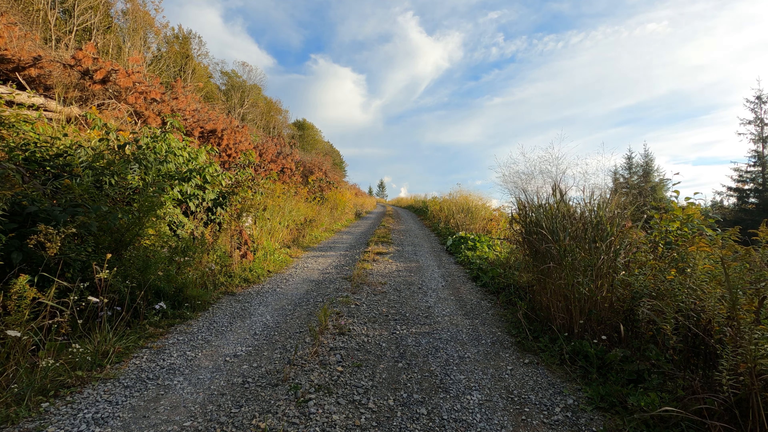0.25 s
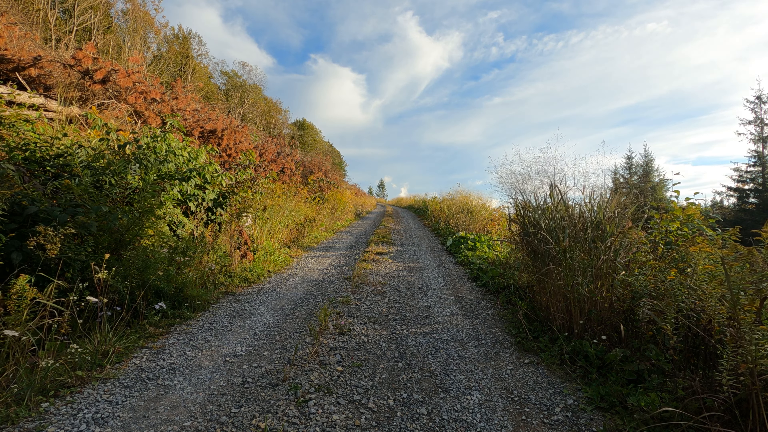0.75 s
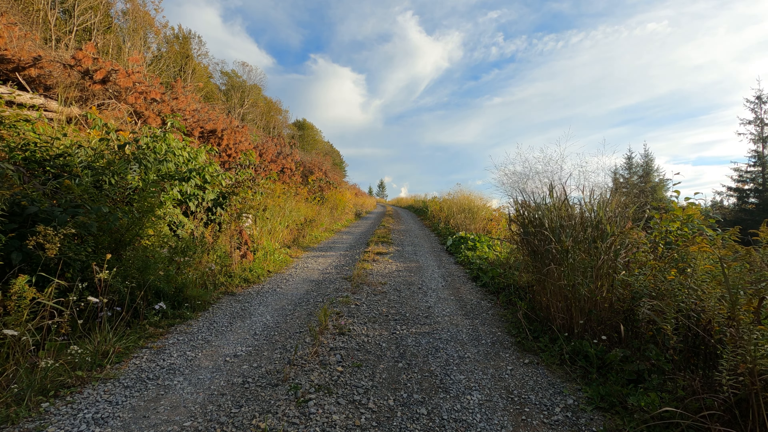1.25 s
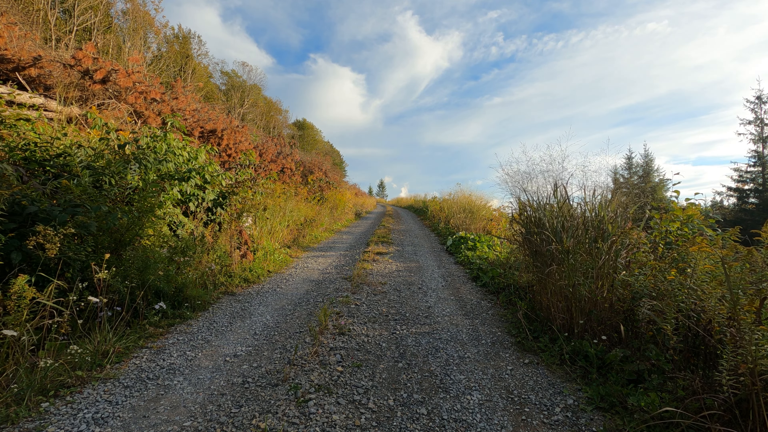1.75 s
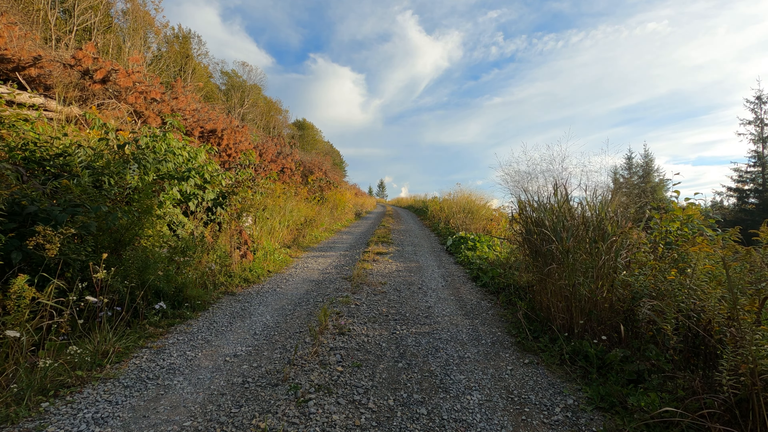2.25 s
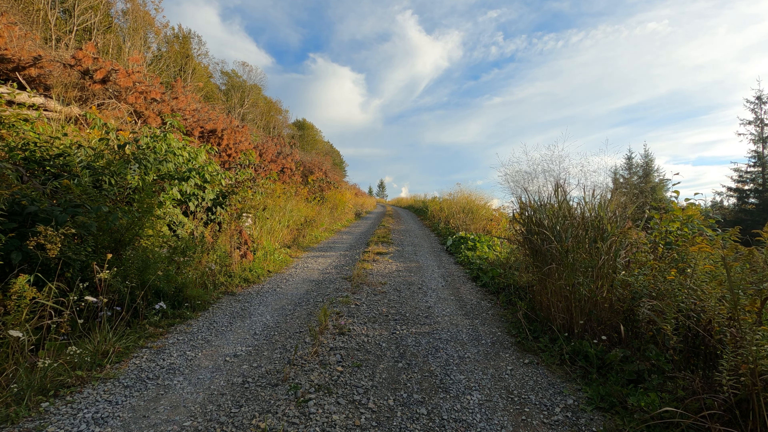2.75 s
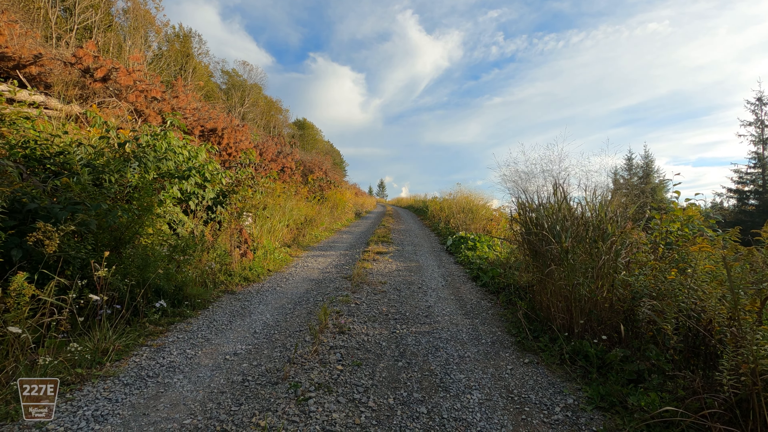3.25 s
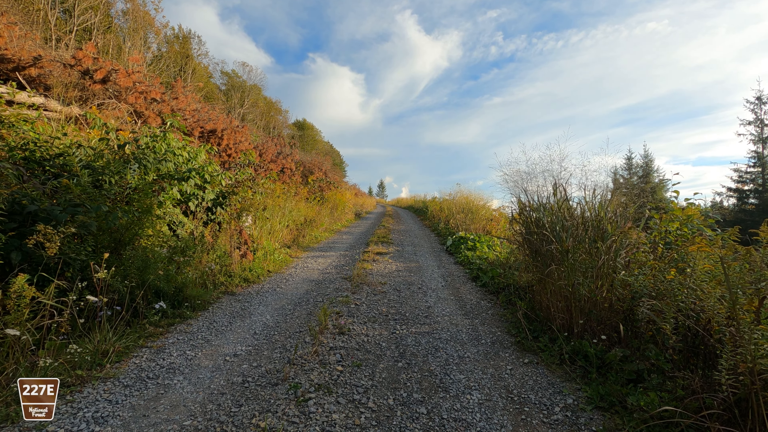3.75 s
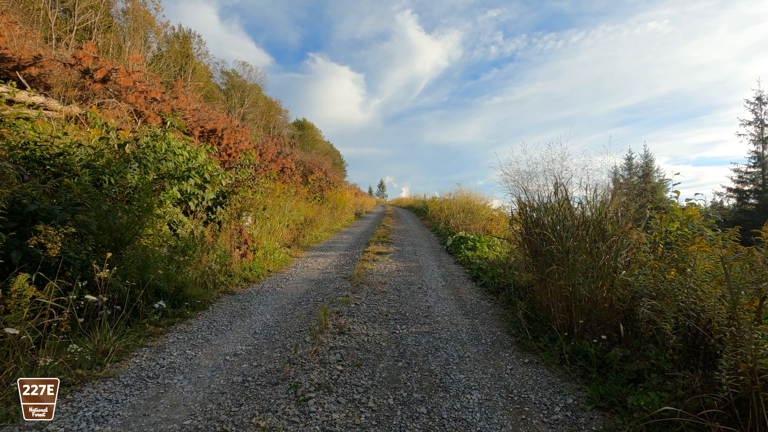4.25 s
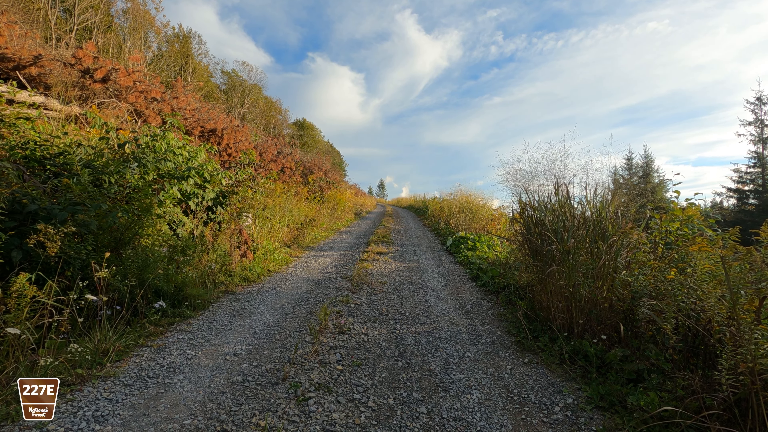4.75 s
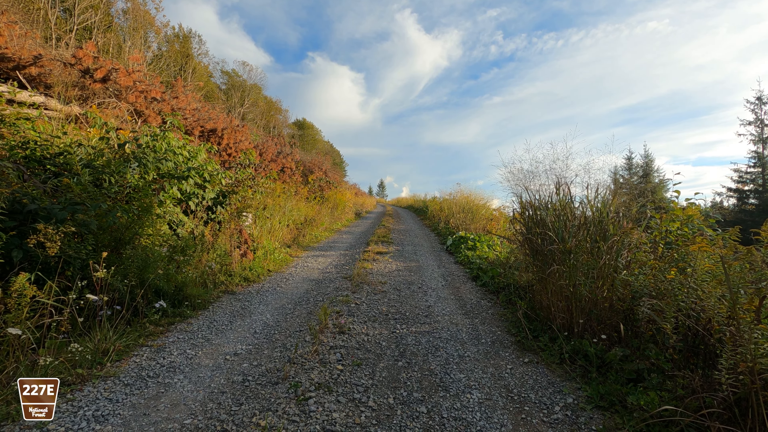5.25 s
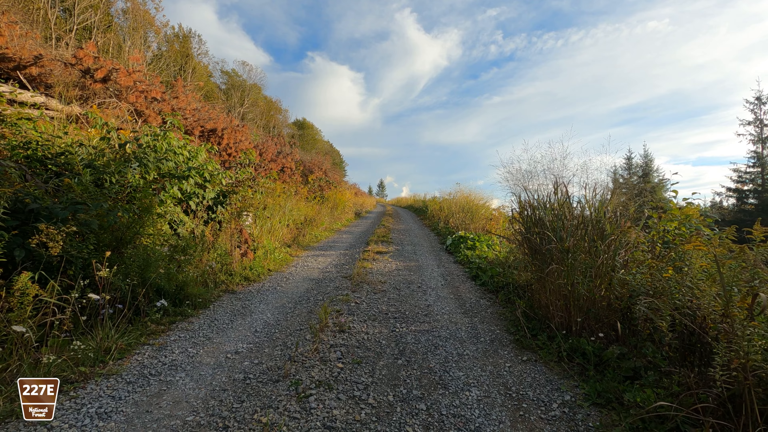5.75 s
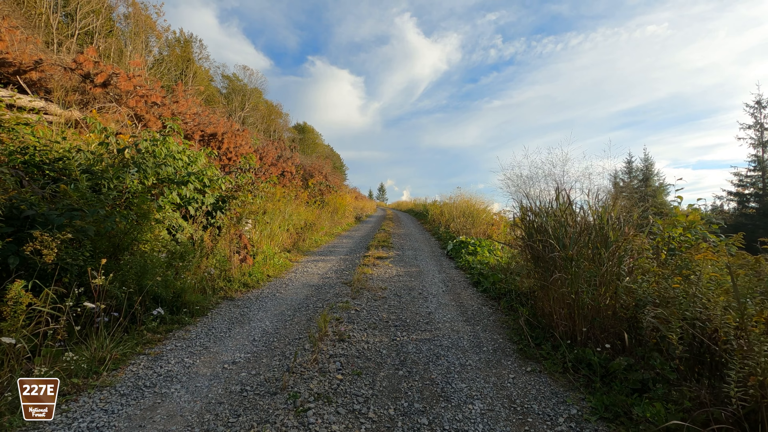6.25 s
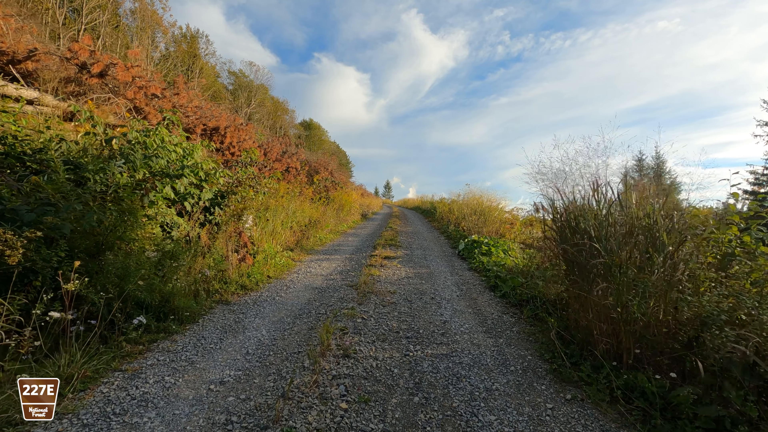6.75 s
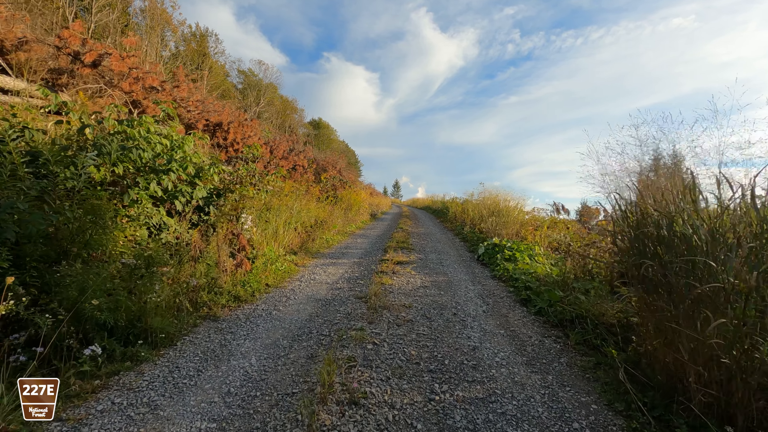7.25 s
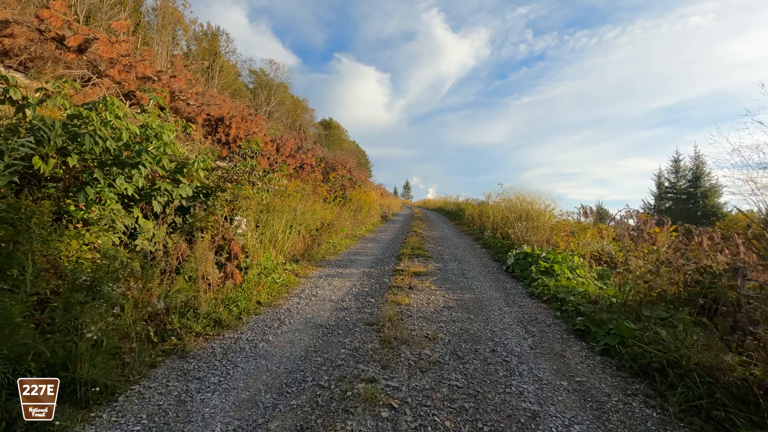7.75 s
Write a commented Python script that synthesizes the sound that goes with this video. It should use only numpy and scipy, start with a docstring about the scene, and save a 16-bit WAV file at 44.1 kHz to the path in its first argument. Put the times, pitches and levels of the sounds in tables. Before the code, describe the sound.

Gravel crunches under slowing vehicle tyres, almost stopping over a faint engine idle, then revs rise and stones pop and knock as it pulls away.

```python
"""Gravel crunches under the tyres of a vehicle creeping up a forest road, heard from on board.
Crunch, grit, pebbles and crackles are random grains or ticks, filtered or rung; stones pop with damped knocks.
The roll slows almost to a halt over an idling engine, then the revs rise and the tyres bite again.
The engine is a sum of crank orders; panel, running gear and metal parts are fuzzy tones or decaying modes."""
import sys
import numpy as np
from scipy import signal
from scipy.fft import rfft, irfft
from scipy.io import wavfile

SR = 44100
rng = np.random.default_rng(int(sys.argv[2]) if len(sys.argv) > 2 else 0)


def log_audio(samples):
    """Write samples as a 16-bit WAV file to the path given in sys.argv[1]."""
    # one column per channel
    frames = np.atleast_2d(samples).T
    # limit to full scale, then quantise
    limited = np.clip(frames, -1, 1)
    pcm = np.round(limited * 32767).astype(np.int16)
    wavfile.write(sys.argv[1], SR, pcm)


N = 353682
TIME = np.arange(N) / SR
HZ = np.fft.rfftfreq(4096, 1 / SR)
EDGE_HZ = 14200  # upper band limit
IDLE_CRANK_HZ = 18.02
BOOM_DB, BOOM_SLOPE = -57, 1.2  # cabin boom at the loudest idle; its dB per dB of idle level
SLOW_S, SLOW_FOR_S = 0.42, 2  # panel buzz comes forward as the wheels slow
DRIVE_S, DRIVE_FOR_S = 5.8, 0.18  # drive takes up
SPIN_S, SPIN_HALF_S = 6.33, 0.12  # wheels slip at the height of the pull
PATCH_HALF_S = 0.044  # half the time spent on a patch

# All levels are relative; the functions set the final balance.
# Tyres slowing down: (time [s], crunch [dB], grit hiss [dB])
COAST_LEVELS = [(0.2, -41.5, -53), (1.1, -43.5, -55), (1.6, -45.5, -60.5), (2.45, -46, -58.5),
                (3.15, -50.5, -63), (3.85, -58.5, -66), (4.3, -57.5, -67.5), (5.05, -55, -62),
                (5.85, -58.5, -64.5)]
# Tyres pulling away: (time [s], crunch [dB], grit hiss [dB])
PULL_LEVELS = [(5.9, -51, -62.5), (5.96, -47.5, -59.5), (6.05, -43.5, -51), (6.25, -40.5, -46.5),
               (6.44, -38, -52), (6.58, -45.5, -55), (6.97, -47, -59.5), (7.2, -47, -58.5),
               (8.0, -47.5, -59)]
# Gravel through the bodywork, coasting: (frequency [Hz], density [dB per Hz])
COAST_COLOUR = [(45, -8), (110, -7.5), (170, -1.5), (300, -10), (500, -2), (750, -8), (1000, -17),
                (1400, -23), (2100, -28), (3000, -29.5), (4200, -36), (5800, -42.5), (6600, -48),
                (9500, -58), (13000, -84)]
# Gravel at a crawl: (frequency [Hz], density [dB per Hz])
CREEP_COLOUR = [(45, -5.5), (150, -2.5), (300, -10.5), (500, -4), (750, -12.5), (1400, -13), (2100, -22),
                (4200, -27.5), (7500, -42), (9500, -53), (13000, -64)]
# Gravel under driven wheels: (frequency [Hz], density [dB per Hz])
PULL_COLOUR = [(45, -8), (100, -2), (170, 0.5), (230, 3.5), (300, -5.5), (500, -5.5), (750, -15),
               (1000, -14), (1400, -19.5), (2100, -20.5), (3000, -26), (4200, -31), (5600, -38),
               (7500, -40.5), (9000, -50.5), (10800, -52), (13000, -66)]
# Wheel-arch and panel resonances: (frequency [Hz], width [Hz], lift at full ring [dB])
PANEL_MODES = [(707, 82, 6.5), (971, 52, 9.5), (1422, 340, 9), (2136, 150, 7), (2760, 24, 11.5),
               (3770, 110, 6), (4270, 47, 5), (5120, 180, 4)]
# Loose patches swell the crunch, firm ones drop it: (time [s], change [dB])
PATCHES = [(0.57, 2), (1.099, 3.5), (2.64, -1), (2.9, 1.5), (2.99, -3), (3.13, 2.5), (3.34, -4.5),
           (3.43, 2.5), (4.37, -12)]
# Idling engine: (time [s], level [dB])
IDLE_LEVELS = [(0, -49), (2.2, -50.5), (2.9, -59), (4.3, -67), (5.85, -65), (6.05, -81)]
# Idle harmonics: (multiple of crank speed [-], level [dB])
IDLE_ORDERS = [(4, -28), (5, -16), (6, -4), (7, -11.5), (8, -8.5), (9, -3.5), (10, -9), (12, -6), (13, -22),
               (19, -6.5), (23, -14.5)]
# Engine under load: (time [s], crank speed [Hz], level [dB])
LOAD_REVS = [(5.92, 24.77, -56.5), (6.05, 30.54, -46), (6.2, 36.8, -44), (6.5, 36.9, -47.5),
             (6.75, 32.2, -55.5), (6.95, 30.72, -62), (7.5, 33.63, -54), (8.02, 35.5, -55.5)]
# Load harmonics: (multiple of crank speed [-], level [dB])
LOAD_ORDERS = [(1, -20), (2, -1), (3, -0.5), (4, 0), (5, -6.5), (6, -5.5), (7, -25), (8, -24)]
# Belt and fan whine: (frequency [Hz], level [dB])
WHINE_TONES = [(333.8, -75.5), (495.3, -80.5), (683.7, -64.5), (742.9, -78.5), (920.5, -76), (1373, -75),
               (1497, -79.5), (2180, -87)]
# Stones popping from under a tyre: (time [s], level [dB], pitch [Hz], swell [cycles], low body [dB],
# rattle [dB], rattle t60 [s], crack [dB], left minus right [dB])
STONES = [(1.123, -28, 298, 1.2, -6, 0, 0.12, -11.5, -3),
          (1.5341, -23.5, 448.0, 0.8, -15, 3.5, 0.05, -7.0, 0.5),
          (1.5456, -30.5, 310, 1.1, -15.0, 4, 0.15, -22.0, 2.5),
          (1.6558, -34, 408.0, 2.6, -6, -18, 0.05, -29, -4.5),
          (3.5586, -35, 474, 0.87, -8, 0.5, 0.21, -25, 0),
          (3.5733, -30, 463, 0.43, -15, -4.5, 0.18, -34.0, 1),
          (3.6032, -40, 350.0, 0.92, 4, -8, 0.18, -26, 0), (3.633, -41, 347.0, 1.3, -6, -16, 0.1, -24.0, 0),
          (4.0397, -37.5, 387, 1.5, 3.0, 0, 0.3, 2.5, 5), (4.0818, -34, 510, 1.1, -1, 1, 0.1, -25, 1),
          (4.4135, -39, 567.0, 0.7, -16, 3.5, 0.088, -13.0, 2),
          (4.4415, -35, 374, 2.3, -13, 1, 0.11, -10, 1),
          (4.4637, -24, 364.0, 1.7, -19.0, -7, 0.18, -14, -1),
          (4.4797, -32, 590, 0.94, -1, -1, 0.21, -25.0, 0),
          (4.4955, -30, 418.0, 0.58, 5, -17, 0.1, -23, 1.0),
          (4.5136, -40.5, 294, 1.4, 1, -1, 0.25, -19.0, 3),
          (4.5909, -42.5, 224.0, 0.45, 4, 5, 0.14, -11.5, 1.5),
          (4.606, -41, 333.0, 2.5, -9, -17, 0.08, -28.0, 1),
          (4.908, -44.0, 290, 1.3, -10, 1.5, 0.21, -12, 1),
          (6.295, -25.5, 525.0, 1.3, -20, -6.5, 0.34, -33, -5.5),
          (6.3038, -28, 353, 1.1, -13, -12, 0.04, -10, 2),
          (6.3372, -25.5, 410, 0.86, -1, -3.0, 0.04, -9.5, -1),
          (6.359, -24.5, 560.0, 1.1, 2, 1, 0.029, -23, -2),
          (6.3843, -20.5, 645, 1.2, -11, -8.5, 0.09, -31, -0.5),
          (6.4845, -20.0, 410, 2.16, -13, -8, 0.24, -6, -0.5),
          (6.52, -31.5, 220.5, 2.1, -6, -8, 0.11, -18.0, -3),
          (6.8261, -31.5, 340, 0.99, 0, -5, 0.18, -11, -2),
          (6.8481, -19.5, 384.0, 1.23, -2.5, -7.5, 0.15, -22, -1.3),
          (6.8563, -26.5, 433.0, 2.8, -23, -2, 0.11, -19.0, -1),
          (6.887, -29.5, 217, 1.2, -0.5, -9.0, 0.037, -31.0, -2),
          (7.101, -30.5, 603, 2, -26, -15, 0.14, -34.0, 5),
          (7.1147, -31.0, 513, 1.6, -8, -5.0, 0.073, -25.0, -2),
          (7.1314, -37.0, 702, 2.2, 6, -3, 0.29, -25.0, 1.4),
          (7.1574, -28.5, 582.0, 3, -3, -9.5, 0.15, -23, 2),
          (7.2445, -22.0, 498, 2.4, -14, -9, 0.22, -19, -1.5),
          (7.2515, -20.5, 680, 0.63, 6, -6, 0.1, -27, -0.5),
          (7.442, -16.5, 435, 1, -1.5, -14, 0.056, -25, 2),
          (7.4577, -38.5, 345, 2.6, -12, 7.5, 0.15, -13, 1),
          (7.5475, -24.5, 491.0, 1.6, -3.0, -10.5, 0.3, -30.0, -1),
          (7.6798, -31.0, 553, 2.5, -12, -20, 0.04, -35.0, 4.9),
          (7.6935, -26.5, 602, 2.8, -5.5, -9.5, 0.19, -32, 2.5),
          (7.7724, -32.5, 511.0, 1.3, -12, -10, 0.17, -31.0, 5.5),
          (7.8791, -22, 553, 2.2, -2, -3, 0.087, -30, 0.2),
          (7.9017, -30, 203, 0.64, -6, -9.0, 0.22, -30.0, 0.5),
          (7.943, -31.5, 463.0, 1.05, -23, -3.0, 0.13, -34.0, 3.5)]
# A wheel drops off a stone and the suspension thuds:
# (time [s], level [dB], pitch [Hz], rattle [dB], rattle t60 [s])
THUDS = [(1.142, -25.5, 104, -14, 0.18), (1.167, -33.5, 142, -13, 0.11), (2.012, -30, 89, -20, 0.47),
         (3.574, -26.5, 124, -17, 0.23), (3.596, -32, 110, -21, 0.13), (3.612, -33, 115, -20, 0.12),
         (4.043, -22, 140, -14.5, 0.32), (4.070, -26.5, 95, -13, 0.27), (4.121, -38, 115, -19, 0.2),
         (4.147, -37, 105, -16, 0.34), (4.518, -33, 123, -7.5, 0.24), (5.175, -30, 100, -9, 0.15),
         (6.088, -24.5, 121, -18, 0.16)]
# Grit squeezed against the wheel arch: (time [s], level [dB], t60 [s], fine-sand lift [dB])
SCRUNCHES = [(0.112, -37, 0.22, -21), (0.145, -38.5, 0.22, -13), (1.531, -32.5, 0.17, -13),
             (1.548, -38, 0.17, -11), (4.043, -44.5, 0.22, -1), (4.076, -50.5, 0.47, -8),
             (4.412, -36, 0.11, 6), (4.419, -33.5, 0.17, 6.5), (4.433, -48, 0.12, 3), (4.476, -42, 0.12, 1),
             (4.497, -45, 0.11, -14), (4.516, -43, 0.088, 10), (4.577, -44.5, 0.065, 16),
             (4.897, -46, 0.082, 13), (5.353, -45.5, 0.27, 0)]
# Colour of the squeezed grit: (frequency [Hz], gain [dB])
SCRUNCH_COLOUR = [(110, -9.5), (300, 15), (700, 6), (1000, 3.5), (1500, -2), (1900, -7), (2300, -3.5),
                  (2700, -0.5), (3200, -9.5), (4200, -11.5), (5500, -10), (7500, -20), (9500, -30),
                  (13000, -46)]
# Wheel-arch ringing under the grit: (frequency [Hz], level [dB])
ARCH_MODES = [(710, -1), (1390, -19), (1800, -5), (2000, -10), (2680, -18), (3450, -18), (4120, -27),
              (7150, -23)]
# Stones snapping against their neighbours: (time [s], level [dB], pitch [Hz])
CRACKLES = [(0.129, -33.5, 1404), (0.229, -43, 2020), (0.350, -48, 3180), (0.392, -43, 2060),
            (0.557, -39, 1450), (0.572, -54, 3400), (0.616, -45, 1660), (0.642, -50, 2210),
            (0.732, -42, 2440), (0.900, -52, 4470), (1.060, -45, 2010), (1.134, -42.5, 1730),
            (1.142, -54, 4400), (1.228, -48, 1700), (2.035, -53, 2350), (2.408, -57, 3300),
            (2.415, -53, 2360), (4.466, -39, 2450), (4.499, -39.5, 1400), (4.500, -50, 4180),
            (5.984, -47, 2980), (5.991, -44, 980), (6.047, -53, 1920), (6.035, -45, 1900),
            (6.080, -40, 2820), (6.087, -53, 7430), (6.138, -41, 2870), (6.163, -38, 2410),
            (6.172, -41, 1710), (6.224, -46, 4220), (6.228, -37, 2520), (6.245, -38, 2070),
            (6.250, -52, 5190), (6.291, -41, 2730), (6.333, -35, 1637), (6.382, -35.5, 2140),
            (6.458, -38, 2220), (6.467, -43, 1980), (6.547, -40.5, 2420), (6.573, -45, 2150),
            (6.661, -52, 2180), (6.701, -53, 3880), (6.848, -40.5, 1760), (6.95, -54, 1680),
            (7.146, -51, 3380), (7.160, -46, 1800), (7.210, -56, 4060), (7.301, -51, 2380),
            (7.428, -56, 4300), (7.455, -60, 7460), (7.511, -57, 3220), (7.717, -45, 2130),
            (7.748, -45.5, 2110), (7.780, -50, 2420), (7.832, -45, 2170), (7.845, -48, 2260),
            (7.867, -52, 2500), (7.977, -51, 2050)]
# Thin chirps of the running gear: (frequency [Hz], level re grit hiss [dB])
CHIRP_TONES = [(2200, -3.5), (2420, -11), (2910, -13), (3800, -8), (4080, -14.5), (5450, -21)]
# Running-gear squeaks: (time of loudest point [s], level [dB], pitch [Hz], half length [s])
SQUEAKS = [(1.400, -55, 2190, .012), (1.505, -52, 2220, .009), (1.678, -66, 3940, 0.0068),
           (1.72, -54, 2190, 0.0069), (1.826, -52, 2220, 0.015), (1.874, -65, 3780, 0.022),
           (2.030, -54.5, 2180, 0.016), (2.075, -61, 3740, 0.0091), (2.130, -57, 3800, 0.013),
           (2.190, -57.5, 2190, .009), (2.425, -55, 2180, 0.017), (2.510, -64, 3790, 0.023),
           (2.671, -62, 2200, .018), (2.856, -74, 3810, .009), (2.905, -65, 3900, 0.0079),
           (3.068, -69, 3780, 0.012), (3.19, -63, 3800, .009), (3.341, -65, 3790, 0.011),
           (3.528, -68, 3820, .01)]
# Jolts of the loose panel: (time [s], level [dB], pitch [Hz])
JOLTS = [(0.318, -37.5, 671), (0.365, -38.5, 758), (0.985, -38, 762), (1.33, -37.5, 710), (1.495, -37, 747),
         (1.77, -38.5, 707), (1.82, -37.5, 659), (1.88, -36, 740), (2.076, -37.5, 715), (2.17, -36.5, 720),
         (2.222, -37, 697), (2.334, -42, 686), (2.452, -46, 742), (2.505, -41, 704), (2.555, -37.5, 694),
         (2.72, -35, 713), (2.752, -40.5, 760), (2.779, -38, 703), (2.836, -39, 680), (2.892, -35.5, 696),
         (3.06, -39.5, 681), (3.085, -38, 704), (3.161, -40, 671), (3.226, -39, 694), (3.393, -39, 684),
         (3.466, -53, 710), (3.521, -44.5, 700), (3.69, -50.5, 685), (3.75, -46.5, 720),
         (3.863, -47.5, 674), (4.024, -40.5, 670), (4.769, -42.5, 717), (6.025, -37, 724),
         (6.045, -39.5, 1014), (6.145, -37.5, 971), (6.218, -33.5, 702), (6.245, -34, 721),
         (6.415, -42, 744)]
# Loose metal part clunking: (time [s], level [dB], brightness [dB per octave])
CLUNKS = [(4.414, -40, -1.5), (4.422, -43.5, 5.5), (4.477, -55, 6), (4.498, -50, -2), (4.516, -42, -17),
          (4.531, -49, -22), (4.578, -51, -12)]
# Its modes: (frequency [Hz], level [dB], t60 [s])
CLUNK_MODES = [(1754, -6.5, 0.11), (1910, -7.5, 0.18), (2110, -10, 0.21), (2680, -3, 0.067),
               (2934, -11, 0.12), (3490, -6.5, 0.14), (3850, -15, 0.11), (4077, -6, 0.11),
               (4160, -13.5, 0.2), (4820, -18, .15), (7100, -17, 0.081)]
# Bright clink of a small part: (time [s], level [dB], brightness [dB per octave])
CLINKS = [(4.897, -48, 0.0057)]
# Its modes: (frequency [Hz], level [dB], t60 [s])
CLINK_MODES = [(2650, -9, .068), (2875, -9, .09), (3750, -5.5, 0.079), (6560, -11, .07), (7170, 0, 0.049),
               (7520, -11, 0.1), (10100, -17, 0.044)]
# Duller clack of a small part: (time [s], level [dB], brightness [dB per octave])
CLACKS = [(5.356, -46.5, 0)]
# Its modes: (frequency [Hz], level [dB], t60 [s])
CLACK_MODES = [(1010, -3, 0.074), (1380, 1, 0.13), (1965, -24, 0.063), (2520, -3, 0.055),
               (2540, -10, 0.098), (3600, -6, 0.086), (4840, -16, .05), (7460, -17, .06)]
# Very short, faint bursts of high treble: (time [s], level before the band-pass [dB])
TREBLE_BURSTS = [(1.536, -57), (4.046, -60), (6.488, -59), (6.851, -54), (7.452, -52), (7.883, -52)]
# Stereo width: (frequency [Hz], level of the left-right difference [dB])
SIDE_COLOUR = [(60, -24), (250, -16.5), (600, -19), (1200, -6.5), (4000, -3), (8000, -4), (13000, -1)]
# Stereo lean: (frequency [Hz], left minus right at full width [dB])
LEAN = [(100, 0.51), (600, 3.1), (1200, 1.9), (4000, 2.2), (8000, 5.3)]
# The sound starts narrow and opens out: (time [s], width factor [-])
OPENING = [(2.25, 0.0052), (2.9, 0.12), (3.5, 0.59)]


def amp(db):
    """Decibels to gain."""
    return 10 ** (np.asarray(db) / 20)


def evened(x):
    """Scales to rms 1."""
    return x / np.sqrt(np.mean(x ** 2) + 1e-20)


def curves(rows):
    """Each column of a table, linear in time."""
    s, *columns = np.transpose(rows)
    return [np.interp(TIME, s, c) for c in columns]


def read(points):
    """A spectrum, linear in log frequency."""
    hz, value = np.transpose(points)
    return np.interp(np.log(HZ + 1), np.log(hz + 1), value)


def ramp(start_s, length_s):
    """Rises from 0 to 1."""
    return np.clip((TIME - start_s) / length_s, 0, 1)


def bump(centre_s, half_s):
    """A smooth hump of height 1."""
    return np.exp(-((TIME - centre_s) / half_s) ** 2)


def add(mix, s, sound):
    """Mixes a sound in at a time."""
    part = mix[max(round(s * SR), 0):][:len(sound)]
    part += sound[:len(part)]


def colour(x, db):
    """Minimum-phase filter with the given gain, so that clicks keep their attack."""
    log_gain = np.log(amp(np.maximum(db, db.max() - 100)))
    circle = np.concatenate([log_gain, log_gain[-2:0:-1]])
    taps = np.fft.ifft(np.exp(np.conj(signal.hilbert(circle)))).real
    return signal.oaconvolve(x, taps)[:len(x)]


def band(x, low_hz, high_hz, order=3):
    """Band-pass filter."""
    edges_hz = [low_hz, min(high_hz, SR / 2 - 1)]
    return signal.sosfilt(signal.butter(order, edges_hz, "band", fs=SR, output="sos"), x)


def wander(rate_hz):
    """Low-passed noise of rms 1."""
    rolloff = 1 + (np.fft.rfftfreq(N, 1 / SR) / rate_hz) ** 4
    return evened(irfft(rfft(rng.standard_normal(N)) / rolloff, N))


def grains(per_s, spread_db):
    """Random clicks of rms 1, most of them small and a few large."""
    size = amp(spread_db * np.minimum(rng.exponential(1, N), 4))
    return evened(size * rng.choice([-1, 1], N) * (rng.random(N) < per_s / SR))


def fuzzy_tone(hz, blur_hz):
    """A narrow band of noise, about rms 1."""
    carrier = np.exp(2j * np.pi * np.cumsum(hz * np.ones(N)) / SR)
    return ((wander(blur_hz) + 1j * wander(blur_hz)) * carrier).real


def tread(rows):
    """Crunch and grit levels in dB; the patches change the crunch most."""
    crunch_db, grit_db = curves(rows)
    patches_db = sum(db * bump(s, PATCH_HALF_S) for s, db in PATCHES)
    return crunch_db + patches_db, grit_db + 0.28 * patches_db


def hiss(level_db=-90, low_hz=6000, high_hz=9000):
    """Faint steady airy hiss of band-passed noise."""
    return amp(level_db) * evened(band(rng.standard_normal(N), low_hz, high_hz, order=2))


def treble_bursts(length_s=0.00055, low_hz=8000, high_hz=14000):
    """Very short, faint bursts of high treble: decaying noise, band-passed."""
    out, t = np.zeros(N), np.arange(SR // 200) / SR
    for s, db in TREBLE_BURSTS:
        add(out, s, amp(db) * rng.standard_normal(len(t)) * np.exp(-t / length_s))
    return band(out, low_hz, high_hz, order=2)


def whine(level_db=-3, blur_hz=14):
    """Faint fuzzy tones of belt and fan."""
    return amp(level_db) * sum(amp(db) * fuzzy_tone(hz, blur_hz) for hz, db in WHINE_TONES)


def orders(crank_hz, table, jitter, flutter_db):
    """Multiples of the crank speed, each wavering as the firings vary."""
    turns = np.cumsum(crank_hz * (1 + jitter * wander(7.2))) / SR
    total = np.zeros(N)
    for k, db in table:
        tone = np.sin(2 * np.pi * (round(k) * turns + rng.random()))
        total += amp(db + flutter_db * wander(4.4)) * tone
    return np.sqrt(2) * total


def engine():
    """Idle hum with a cabin boom at the firing rate, then the rising drone under load."""
    idle_db, = curves(IDLE_LEVELS)
    idle = amp(idle_db) * orders(IDLE_CRANK_HZ, IDLE_ORDERS, jitter=0.0062, flutter_db=3.5)
    boom_db = BOOM_DB + BOOM_SLOPE * (idle_db - idle_db.max())
    boom = amp(boom_db) * np.sin(2 * np.pi * 2 * IDLE_CRANK_HZ * TIME)
    crank_hz, load_db = curves(LOAD_REVS)
    drone = amp(load_db) * orders(crank_hz, LOAD_ORDERS, jitter=0.0041, flutter_db=2.0)
    return idle + boom + ramp(5.88, 0.055) * drone


def buzz(hz=708, blur_hz=62, drift_hz=28, throb_db=4.0, uneven_db=1.5,
         rolling_db=-13, crawl_db=-8, driven_db=-16, spin_db=14):
    """A loose panel shaken in uneven pulses at idle crank speed; stands out at a crawl and in wheel slip."""
    turns = np.cumsum(IDLE_CRANK_HZ * (1 + 0.057 * wander(13.0))) / SR
    shake = amp(throb_db * np.sqrt(2) * np.cos(2 * np.pi * turns) + uneven_db * wander(9.1))
    share_db = (rolling_db + (crawl_db - rolling_db) * ramp(SLOW_S, SLOW_FOR_S)
                + (driven_db - crawl_db) * ramp(DRIVE_S, DRIVE_FOR_S) + spin_db * bump(SPIN_S, SPIN_HALF_S))
    crunch_db = tread(list(COAST_LEVELS) + list(PULL_LEVELS))[0]
    return amp(crunch_db + share_db) * evened(fuzzy_tone(hz + drift_hz * wander(8.775), blur_hz) * shake)


def jolts(rise_s=0.0016, length_s=0.023, waver=0.023, rattle_db=-11.0, low_hz=520, high_hz=930):
    """A harder jolt makes the panel sing briefly, unsteady in pitch, and rattles the parts around it."""
    out, t = np.zeros(N), np.arange(SR // 10) / SR
    envelope = (1 - np.exp(-t / rise_s)) * np.exp(-(t / length_s) ** 2)
    bend = 1 + waver * wander(70)
    rattle = amp(rattle_db) * evened(band(rng.standard_normal(N), low_hz, high_hz, order=5))
    for s, db, hz in JOLTS:
        now = slice(round(s * SR), round(s * SR) + len(t))
        tone = np.sin(2 * np.pi * np.cumsum(hz * bend[now]) / SR)
        add(out, s, amp(db) * envelope * (tone + rattle[now]))
    return out


def chirps(level_db=-2.0, blur_hz=110, flutter_db=6):
    """High fuzzy running-gear tones that flutter and fade as the wheels slow."""
    fade = np.clip((4.2 - TIME) / 3.96, 0, 1)
    rolling = amp(tread(COAST_LEVELS)[1] + level_db) * fade
    total = np.zeros(N)
    for hz, db in CHIRP_TONES:
        flutter = amp(flutter_db * np.tanh(wander(13)))
        total += amp(db) * evened(fuzzy_tone(hz, blur_hz) * flutter)
    return rolling * total


def squeaks(waver=0.018):
    """Short rubbing squeaks that swell and stop, their pitch never quite steady."""
    out, bend = np.zeros(N), 1 + waver * wander(90)
    for s, db, hz, half_s in SQUEAKS:
        t = np.arange(-3 * half_s, 3 * half_s, 1 / SR)
        turns = np.cumsum(hz * bend[round(s * SR):][:len(t)]) / SR
        add(out, s + t[0], amp(db) * np.exp(-(t / half_s) ** 2) * np.sin(2 * np.pi * turns))
    return out


def metal(blows, modes, rise_s, rough, detune=0.0034):
    """Blows ring the modes of a metal part, which chatters in its seat as they die away."""
    out, t = np.zeros(N), np.arange(SR // 4) / SR
    chatter = wander(170)
    for s, db, tilt_db in blows:
        for hz, mode_db, t60_s in modes:
            start_db = db + mode_db + tilt_db * np.log2(hz / modes[0][0])
            envelope = amp(start_db - 60 * t / t60_s) * (1 - np.exp(-t / rise_s))
            phase = 2 * np.pi * (hz * (1 + detune * rng.standard_normal()) * t + rng.random())
            shaken = rough * chatter[rng.integers(N // 2):][:len(t)]
            add(out, s, envelope * np.sin(phase + shaken))
    return out


def fittings():
    """Loose metal parts clunk, clink and clack at the slowest point of the climb."""
    return (metal(CLUNKS, CLUNK_MODES, rise_s=0.001, rough=1.2)
            + metal(CLINKS, CLINK_MODES, rise_s=0.0023, rough=0.97)
            + metal(CLACKS, CLACK_MODES, rise_s=0.0024, rough=0.84))


def knock(hz, cycles, overtone, overtone_db, rattle_db, rattle_t60_s, below, above, snap_db):
    """A blow snaps and rings a heavily damped part for a few cycles; the chassis rattles on after it."""
    t = np.arange(SR // 3) / SR
    u = t * hz / cycles
    swell = u * np.exp(1 - u)
    tones = np.sin(2 * np.pi * hz * t) + amp(overtone_db) * np.sin(2 * np.pi * overtone * hz * t)
    rattle = evened(band(rng.standard_normal(len(t)), below * hz, above * hz, order=4))
    rattle *= amp(-60 * t / rattle_t60_s) * (1 - np.exp(-t / 0.0043))
    snap = rng.standard_normal(len(t)) * np.exp(-((t - .003) / 0.00038) ** 2)
    return swell ** 2 * tones + amp(rattle_db) * rattle + amp(snap_db) * snap


def thuds(level_db=-2):
    """Low, slow blows through the suspension."""
    out = np.zeros(N)
    for s, db, hz, rattle_db, t60_s in THUDS:
        blow = knock(hz, cycles=0.91, overtone=1.754, overtone_db=-12.5, rattle_db=rattle_db + 6.5,
                     rattle_t60_s=t60_s, below=0.27, above=2.21, snap_db=-43.5)
        add(out, s, amp(db + level_db) * blow)
    return out


def scrunches(level_db=-5, rise_s=0.0023, ring_width=0.05, ring_db=-4, sand_hz=6000.):
    """Short dense sprays of grit ring the wheel arch and die away; fine sand sets their treble."""
    out, t = np.zeros(N), np.arange(SR // 3) / SR
    spray = grains(1800, 1.6)
    sand_shelf = HZ ** 8 / (HZ ** 8 + sand_hz ** 8)
    for s, db, t60_s, sand_db in SCRUNCHES:
        burst = spray[round(s * SR):][:len(t)]
        ring = np.zeros(len(burst))
        for hz, mode_db in ARCH_MODES:
            mode = band(burst, hz * (1 - ring_width), hz * (1 + ring_width), order=2)
            ring += amp(mode_db) * evened(mode)
        grit = evened(colour(burst, read(SCRUNCH_COLOUR))) + amp(ring_db) * ring
        grit = evened(colour(grit, sand_db * sand_shelf))
        add(out, s, amp(db + level_db) * grit * amp(-60 * t / t60_s) * (1 - np.exp(-t / rise_s)))
    return out


def crackles(ring_s=0.0034, bounce_s=0.018, bounce_db=-8.5, scatter=0.22, count=10):
    """A stone snaps, then chatters against others in a quick cluster of ticks, each at its own pitch."""
    out, t = np.zeros(N), np.arange(SR // 25) / SR
    envelope = np.exp(-t / ring_s) * (1 - np.exp(-t / 0.00074))
    for s, db, hz in CRACKLES:
        add(out, s, amp(db) * envelope * np.sin(2 * np.pi * hz * t))
        for delay, detune in zip(rng.random(count), rng.standard_normal(count)):
            tick = envelope * np.sin(2 * np.pi * hz * np.exp(scatter * detune) * t)
            add(out, s + bounce_s * delay ** 2, amp(db + bounce_db) * tick)
    return out


def pebbles(driven_db=-3.5, coast_db=-5, per_s=13, sparse_db=-56, spread_db=1.4, ring_cycles=9,
            tilt_db=-13, clump_db=3, count=40):
    """Pebbles click in clusters; a harder-working tyre stirs up more, until they merge into a crunch."""
    t, out = np.arange(SR // 20) / SR, np.zeros(N)
    grit_db = tread(list(COAST_LEVELS) + list(PULL_LEVELS))[1]
    crowd = np.maximum(amp(grit_db - sparse_db) ** 2, 1)
    for hz in np.geomspace(1100, 7000, count) * rng.uniform(1.0, 1.03, count):
        ring = np.sin(2 * np.pi * hz * t) * np.exp(-t * hz / ring_cycles) * (1 - np.exp(-t / 0.002))
        size = amp(spread_db * np.minimum(rng.exponential(1, N), 3))
        hits = size * (rng.random(N) < crowd * per_s / SR)
        tilt = amp(tilt_db * np.log2(max(hz, 2900) / 2900))  # dB per octave above 2900 Hz
        out += tilt * np.sqrt(hz) * signal.oaconvolve(hits, ring)[:N]
    driven = ramp(DRIVE_S, DRIVE_FOR_S)
    rolling_db = coast_db - 9 * ramp(1.3, 1.9)
    level = amp(grit_db + driven * driven_db + (1 - driven) * rolling_db)
    clumps = amp(clump_db * np.tanh(wander(60)))
    return level * evened(out / np.sqrt(crowd) * clumps)


def stones(crack_hz=1030):
    """Each stone knocks the tyre hollowly on its own side, with a short higher crack; some rattle on."""
    out = np.zeros((2, N))
    for s, db, hz, cycles, body_db, rattle_db, t60_s, crack_db, pan_db in STONES:
        tyre = knock(hz, cycles, overtone=0.585, overtone_db=body_db, rattle_db=rattle_db,
                     rattle_t60_s=t60_s, below=0.31, above=1.364, snap_db=-49)
        crack = knock(crack_hz, cycles=2.5, overtone=1.18, overtone_db=-6.5, rattle_db=-0.5,
                      rattle_t60_s=0.065, below=0.31, above=1.18, snap_db=-31.5)
        for channel, side_db in zip(out, (pan_db / 2, -pan_db / 2)):
            add(channel, s, amp(db + side_db) * (tyre + amp(crack_db) * crack))
    return out


def gravel(rows, spectrum, ring, per_s, spread_db, clump_db, rumble_db, rumble_slope,
           crunch_db, grit_db, rough_db):
    """Stones grind in clumps under the tread; the bodywork muffles them and rings with them."""
    clumps = wander(16.8)
    panels_db = sum(db / (1 + (2 * (HZ - hz) / width) ** 2) for hz, width, db in PANEL_MODES)
    tone_db = read(spectrum) + ring * panels_db
    coarse = evened(grains(per_s, spread_db) * amp(clump_db * clumps)) + 0.58 * rng.standard_normal(N)
    # small chips tick in bands of their own
    edges_hz = np.geomspace(1400, 14000, 9)
    chips = np.zeros(N)
    for low_hz, high_hz in zip(edges_hz, edges_hz[1:]):
        ticks = grains(per_s, spread_db) * amp(clump_db * (clumps + wander(23)) / 2)
        chips += band(ticks, low_hz, high_hz, order=2)
    # stones give way in tiny jerks that roughen all the grit at once
    fine = (chips + rng.standard_normal(N)) * amp(rough_db * np.tanh(wander(170)))
    coarse, fine = colour(coarse, tone_db), colour(fine, tone_db)
    crunch, grit = tread(rows)
    rumble = crunch.max() + rumble_slope * (crunch - crunch.max())
    return (amp(rumble + rumble_db) * evened(band(coarse, 68, 366))
            + amp(crunch + crunch_db) * evened(band(coarse, 313, 1155, order=4))
            + amp(grit + grit_db) * evened(band(fine, 1726, EDGE_HZ, order=4)))


def tyres():
    """The roll dies down to a creep, then hands over to the brighter crunch of driven wheels."""
    slow, driven = ramp(3.13, 1.3), ramp(DRIVE_S, DRIVE_FOR_S)
    coast = gravel(COAST_LEVELS, COAST_COLOUR, ring=1.0, per_s=1600, spread_db=2.0, clump_db=2.5,
                   rumble_db=-1.0, rumble_slope=1.47, crunch_db=1.5, grit_db=-6.5, rough_db=0.0)
    creep = gravel(COAST_LEVELS, CREEP_COLOUR, ring=0.71, per_s=1200, spread_db=1.0, clump_db=1.5,
                   rumble_db=-4.5, rumble_slope=0.98, crunch_db=-2.5, grit_db=-5.0, rough_db=2.0)
    pull = gravel(PULL_LEVELS, PULL_COLOUR, ring=0.9, per_s=450, spread_db=1.5, clump_db=3.5,
                  rumble_db=-8.5, rumble_slope=0.94, crunch_db=-3.5, grit_db=-2.5, rough_db=1.5)
    undriven = np.sqrt(1 - slow) * coast + np.sqrt(slow) * creep
    return np.sqrt(1 - driven) * undriven + np.sqrt(driven) * pull


def spread(x):
    """Scattered reflections off body and verge widen the treble; the bass stays near the middle."""
    size = 2 * (len(HZ) - 1)
    t = np.arange(size) / SR
    scatter = rng.standard_normal(size) * np.exp(-t / 0.005) * (t > .001)
    scattered = signal.oaconvolve(x, scatter / np.linalg.norm(scatter))[:N]
    opening, = curves(OPENING)
    side = opening * colour(scattered, read(SIDE_COLOUR))
    # the left is a little louder, most of all in the high treble
    left, right = colour(x, read(LEAN) / 2), colour(x, -read(LEAN) / 2)
    lean = opening * (left - right) / 2
    return np.array([x + side + lean, x - side - lean])


def scene():
    """Engine, tyres, stones and loose parts together; each stone keeps its own side."""
    knocks = stones()
    middle = knocks.mean(0)
    background = hiss() + treble_bursts() + whine() + engine()
    loose_parts = buzz() + jolts() + chirps() + squeaks() + fittings()
    ground = thuds() + scrunches() + crackles() + pebbles() + tyres()
    return knocks - middle + spread(middle + background + loose_parts + ground)


def record(dry):
    """A quick fade-in, the microphone's bass roll-off and the band limit."""
    fade = ramp(.066, 0.045) ** 1.37
    sound = signal.sosfilt(signal.butter(4, 29, "high", fs=SR, output="sos"), dry * fade)
    low_pass = signal.firwin(511, EDGE_HZ, window=("kaiser", 9), fs=SR)
    return signal.oaconvolve(sound, low_pass[None], "same")


dry = scene()
out = record(dry)
log_audio(out)
```